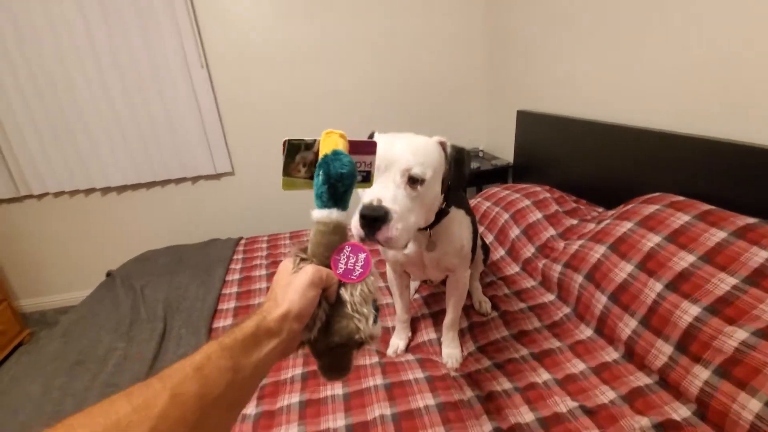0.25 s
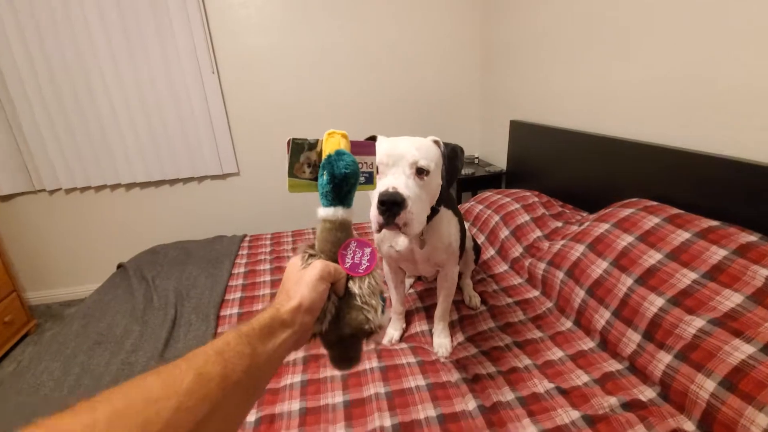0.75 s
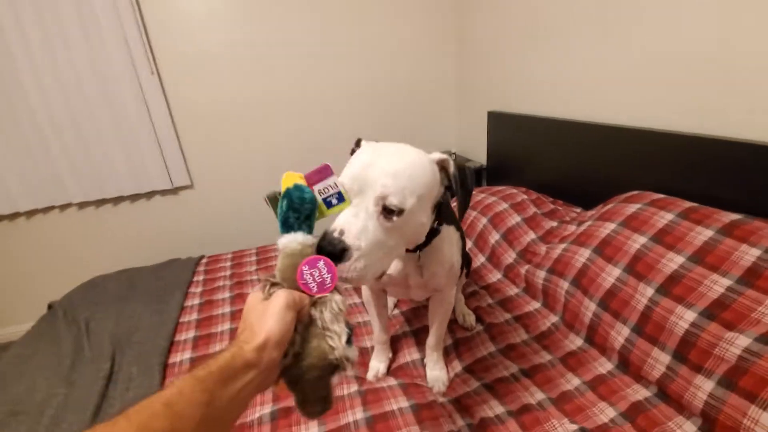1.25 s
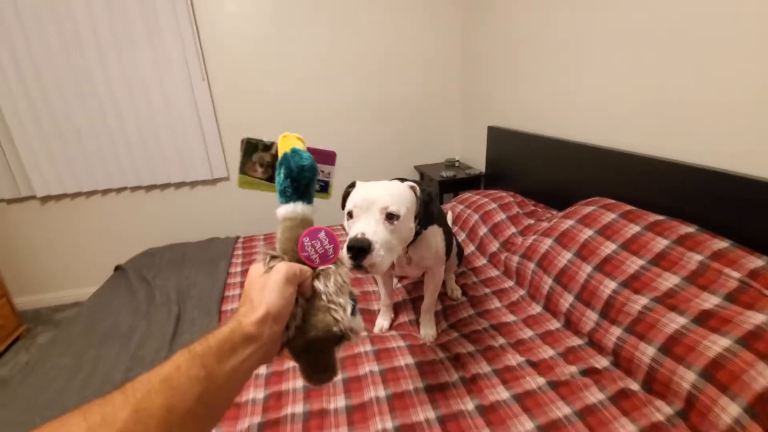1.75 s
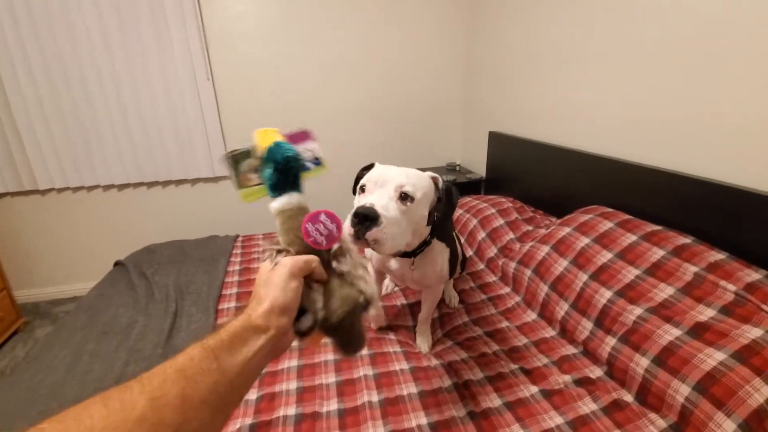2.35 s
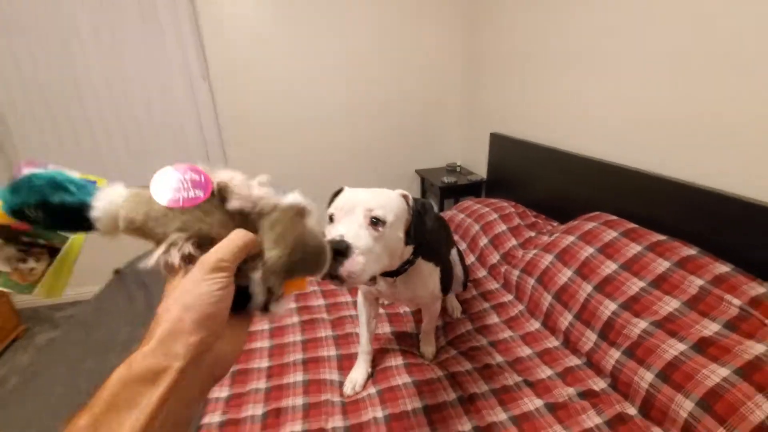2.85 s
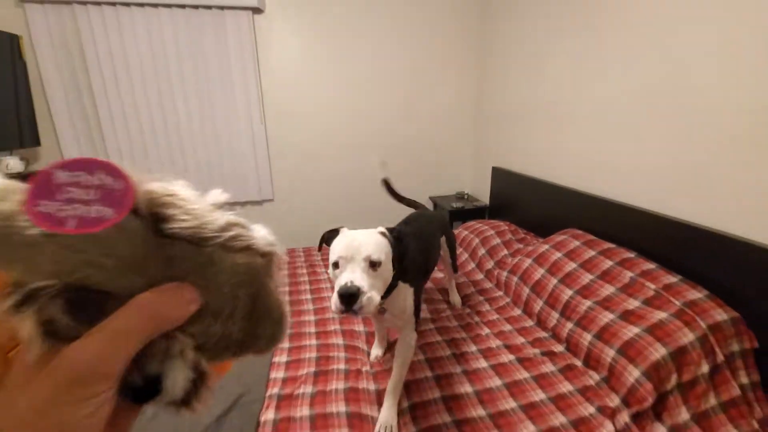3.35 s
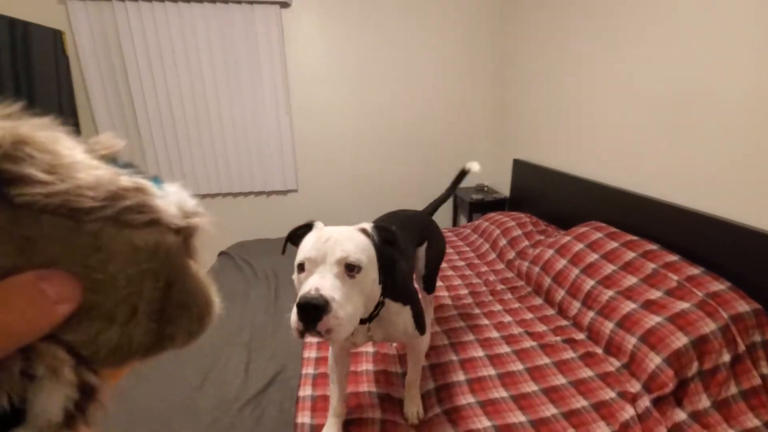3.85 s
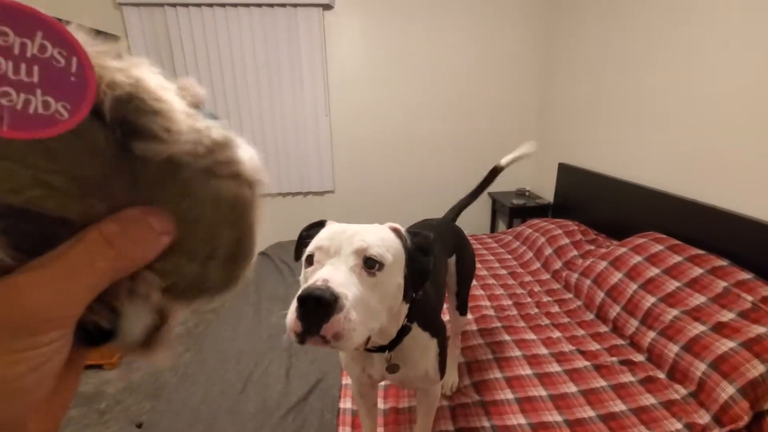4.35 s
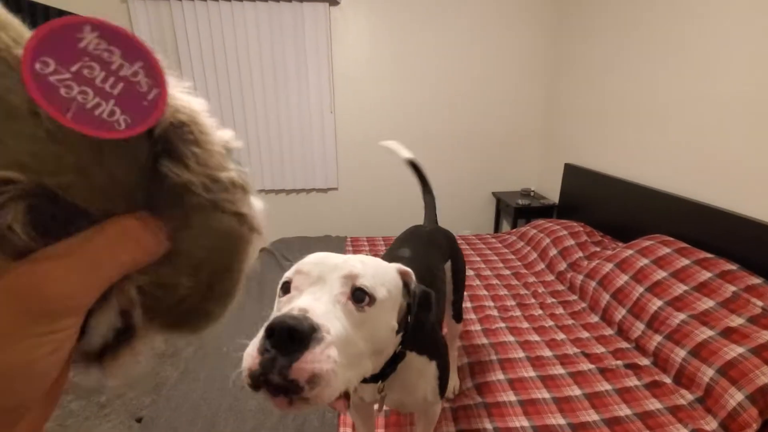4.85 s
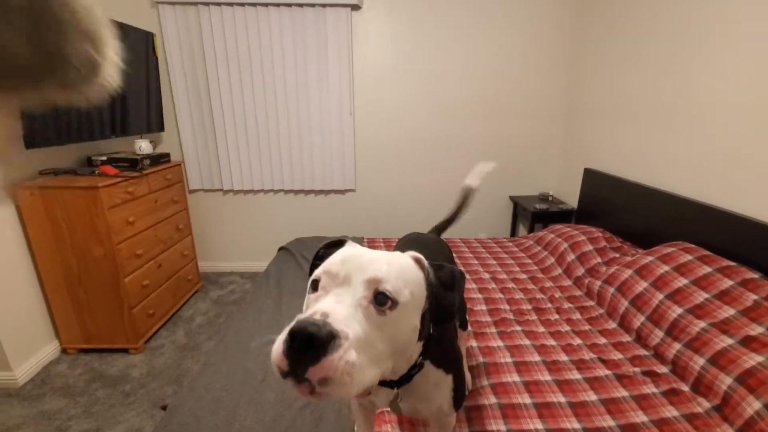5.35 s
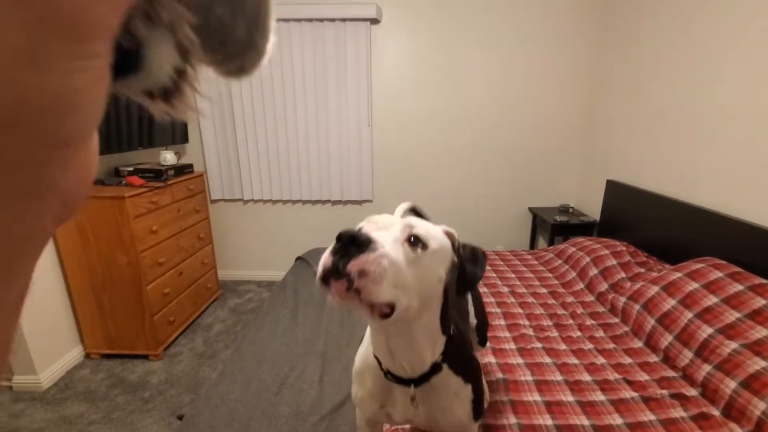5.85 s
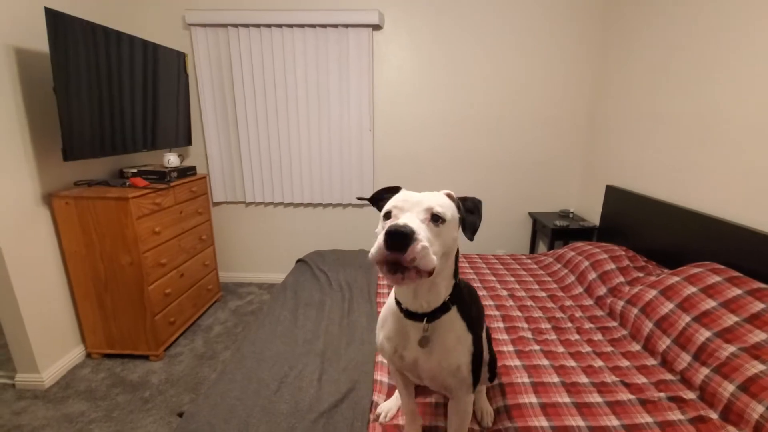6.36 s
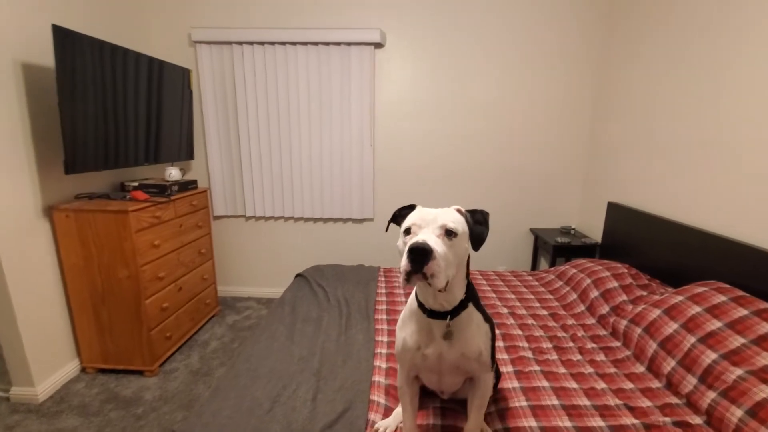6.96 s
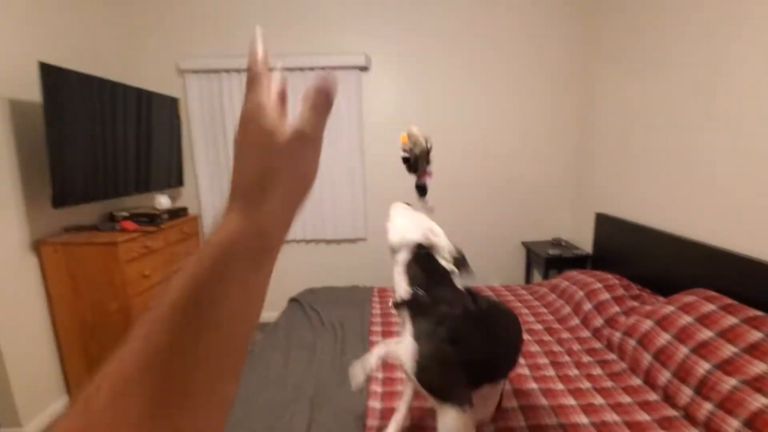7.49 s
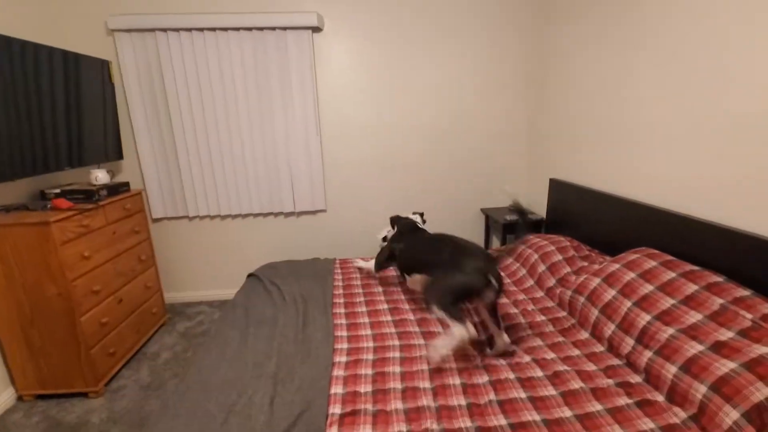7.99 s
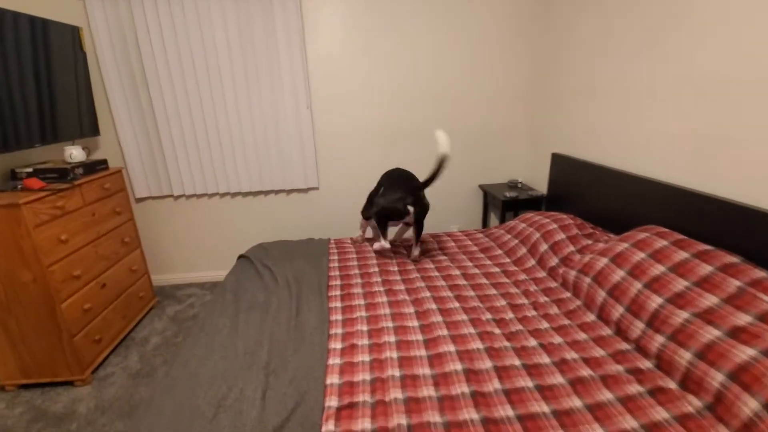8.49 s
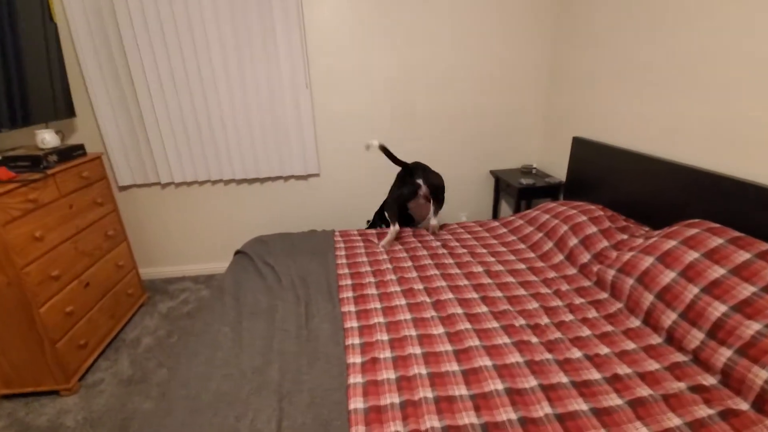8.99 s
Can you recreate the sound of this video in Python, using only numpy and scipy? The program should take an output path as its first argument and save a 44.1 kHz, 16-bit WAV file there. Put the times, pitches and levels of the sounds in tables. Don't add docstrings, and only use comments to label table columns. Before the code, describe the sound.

Close stereo handheld microphone in a softly reverberant carpeted bedroom. Fur and card tags rustle, scrape and snap over low handling rumble and a strong dull thud. A squeaky plush toy then gives two short chirps, a quick run of five, one higher squeak and a last, highest one. Finally a dog bumps the bed, and its collar jingles lightly amid bedding rustle.

```python
import sys
import numpy as np
from scipy import signal
from scipy.fft import rfft, irfft, next_fast_len
from scipy.io import wavfile
from scipy.ndimage import uniform_filter1d, minimum_filter1d, map_coordinates

SR = 44100
rng = np.random.default_rng(int(sys.argv[2]) if len(sys.argv) > 2 else 0)


def attenuation_scalar(level_db):
    decades = np.asarray(level_db, float) / 20
    return 10 ** decades


def master_out(mix):
    frames = np.transpose(np.atleast_2d(mix))
    ceiling = np.clip(frames, -1, 1)
    pcm = np.round(ceiling * 32767).astype(np.int16)
    wavfile.write(sys.argv[1], SR, pcm)


N = 407043

# time_s, level_db
UNREST = [(0, 5.5), (.7, -4), (1.1, 14.5), (2.1, 6.5), (2.27, 4), (2.6, 7), (3.2, 5.5), (3.45, -3),
          (3.92, -12), (4.4, 1.5), (5.2, -4), (5.48, -16), (6.2, -18.5), (6.95, -23), (7.45, 3),
          (7.97, -0.5), (8.6, -2.5), (9.23, 5.5)]


def at_hz(points, hz):
    points_hz, points_db = np.transpose(points)
    return np.interp(np.log(hz), np.log(points_hz), points_db)


def in_time(rows):
    s, *columns = np.transpose(rows)
    return [np.interp(np.arange(N) / SR, s, column) for column in columns]


def rms_one(x):
    return x / np.sqrt(np.mean(x ** 2) + 1e-20)


def bandpass(x, low_hz, high_hz, order=2):
    return signal.sosfilt(signal.butter(order, [low_hz, high_hz], "band", fs=SR, output="sos"), x)


def highpass(x, hz, order=2):
    return signal.sosfilt(signal.butter(order, hz, "high", fs=SR, output="sos"), x)


def coloured(points, channels=1):
    size = next_fast_len(N)
    hz = np.maximum(np.arange(size // 2 + 1) * SR / size, 1)
    gain = (hz > points[0][0] / 2) * attenuation_scalar(at_hz(points, hz))
    white = rng.standard_normal((channels, size))
    return rms_one(irfft(rfft(white) * gain, size)[:, :N])


def drift(rate_hz):
    knots = rng.standard_normal(int(N / SR * 200) + 2)
    return np.interp(np.arange(N) / SR * np.clip(rate_hz, 1, 190), np.arange(len(knots)), knots)


def swells(s, hold_s, level_db, rise_db_s, fall_db_s):
    t = np.arange(0, N + 64, 64) / SR
    early = np.maximum(s[:, None] - t, 0)
    late = np.maximum(t - (s + np.abs(hold_s))[:, None], 0)
    moves = attenuation_scalar(level_db[:, None] - rise_db_s * early - fall_db_s * late)
    return np.interp(np.arange(N) / SR, t, np.sqrt(np.sum(moves ** 2, axis=0)))


def ports(x, lag, pan_db=0):
    late = np.interp(np.arange(N) - lag, np.arange(N), x)
    return np.array([x * attenuation_scalar(pan_db / 2), late * attenuation_scalar(-pan_db / 2)])


def squeaker():
    # start_s, top_hz, rise_s, held_s (until let go), level_db
    squeezes = [
        (2.7518, 1525, .044, .0435, -7),
        (2.977, 1797, .033, 0.041, -5),
        (3.988, 1750, 0.031, 0.049, -5.5),
        (4.199, 1658, .030, 0.043, -5.5),
        (4.397, 1787, 0.02, 0.046, -6),
        (4.591, 1675, .034, 0.046, -7.5),
        (4.787, 1578, .032, .048, -6.5),
        (5.6005, 2028, 0.049, .047, -6),
        (7.140, 2403, .043, 0.046, -5.5),
    ]
    climbs = [1.1, 1.05, .86, 1.1, 1.1, 0.69, 1.2, 1.02, 1.03]
    vents_db = [0.5, -1, -2, -2, -2, 1, -2, -3, 0.5]
    reed_db = [5, -8, -13, -15, -20, -23, -25, -27, -28, -29, -31, -32]
    # freq_hz, level_db
    plush = [(900, -14.5), (1250, -15.5), (1500, -8.5), (1750, -4), (2000, -4), (2400, -3.5), (2800, -3),
             (3500, 0.5), (5200, -1.5), (7200, 3), (8600, -4.5), (10000, -10), (12000, -9.5), (16000, -4)]
    sag_hz, sag_s, fade_s = 1100, 0.0063, 0.019
    flip_hz, flip_ratio, flipped_db = 2340, 1.14, -8
    purer_db, let_go_db, slack_db = -0.5, 1.66, 3.5
    choke_hz, choke_db = 1750, -8.5
    waver_db, own_waver = 2.6, .8
    air_db, refill_db, refill_t60_s = -22, -38, 0.62
    tone_len = 5000

    out, t = np.zeros((2, N)), np.arange(int(.5 * SR)) / SR
    air = bandpass(rng.standard_normal((2, N)), 2500, 9500, order=4)
    order = np.arange(1, len(reed_db) + 1)[:, None]
    waver = rng.standard_normal((len(squeezes), 3, len(reed_db), 30))
    waver = np.sqrt(1 - own_waver ** 2) * waver[:, :1] + own_waver * waver[:, 1:]
    for (s, top_hz, rise_s, held_s, level_db), climb, vent_db, knots in zip(squeezes, climbs, vents_db, waver):
        at = round(s * SR)
        gone = np.maximum(t - held_s, 0) * min(top_hz / 1700, 1) ** 3.5

        first_hz = 1240 + 0.1 * (top_hz - 1750)
        pressed = first_hz + (top_hz - first_hz) * np.sin(np.pi / 2 * np.minimum(t / rise_s, 1.2) ** climb)
        pressed = uniform_filter1d(pressed * np.where(pressed > flip_hz, flip_ratio, 1), size=90)
        hz = (sag_hz + (pressed - sag_hz) * np.exp(-(gone / sag_s) ** 1.05))[:tone_len]
        turns = 2 * np.pi * np.cumsum(hz) / SR
        blow = np.clip(t / 0.0021, 0, 1) * np.exp(-(gone / fade_s) ** 2)

        unsteady = np.array([[np.interp(t[:tone_len], np.arange(30) * .005, k) for k in port] for port in knots])
        unsteady = unsteady * np.sqrt(np.minimum(order, 5) - .8)
        flipped = np.clip((pressed[:tone_len] / flip_hz - 1) / (flip_ratio - 1), 0, 1)
        height_db = np.array(reed_db)[:, None] + (vent_db + flipped_db * flipped) * (order > 1)
        height_db = height_db + purer_db * np.log2(hz / 1500) * np.log2(order) + waver_db * unsteady
        height_db = height_db - gone[:tone_len] / sag_s * (let_go_db * np.log2(order) + slack_db * (order == 1))
        height_db = height_db + choke_db * np.log2(np.maximum(hz / choke_hz, 1)) + at_hz(plush, order * hz)
        heights = attenuation_scalar(height_db) * (order * hz < 17000)
        tone = np.sum(heights * np.cos(order * turns + .12 * order ** 2), axis=1)
        out[:, at:at + tone_len] -= attenuation_scalar(level_db) * blow[:tone_len] * tone

        refill = attenuation_scalar(refill_db - 60 * gone / refill_t60_s) * (1 - blow) * (t > held_s)
        hiss = attenuation_scalar(air_db) * blow + refill
        out[:, at:at + len(t)] += attenuation_scalar(level_db) * hiss * air[:, at:at + len(t)]
    return out


def held_close(x):
    # time_s, right_lag_samples, left_right_db
    hand = [
        (2.8, 18, -1.5),
        (3.0, 20.5, -2.5),
        (4.0, 22, .5),
        (4.7, 22, 1),
        (4.82, 21.5, 1.5),
        (5.6, 23, 4),
        (7.1, 19.5, 2.5),
    ]
    # left_delay_s, right_delay_s, level_db
    echoes = [(.00035, .00025, -12), (.0034, .0027, -14), (.0071, .0083, -15), (.0112, .0098, -16)]
    # freq_hz, left_right_db
    lean = [(60, 2.5), (110, 6), (200, 0.5), (380, -2.5), (700, -0.5), (1290, 2), (2380, -9), (4400, 6.5),
            (8120, 1), (15000, 9.5)]
    # freq_hz, phase_rad
    bend = [(1300, 1.95), (1750, 2.15), (2600, 1.35), (3400, .6)]
    size = next_fast_len(N)
    hz = np.maximum(np.arange(size // 2 + 1) * SR / size, 1)
    paths = 1 + sum(attenuation_scalar(db) * np.exp(-2j * np.pi * hz * [[left], [right]]) for left, right, db in echoes)
    shadow = attenuation_scalar(at_hz(lean[1:], hz) * [[.5], [-.5]])
    shadow = shadow * np.exp(1j * at_hz(bend, hz) * np.array([[0], [1]]))
    lag, pan_db = in_time(hand)
    late = map_coordinates(x[1], [np.arange(N) - lag], order=3)
    direct = [x[0], late] * attenuation_scalar(pan_db * [[.5], [-.5]])
    return irfft(rfft(direct, size) * paths * shadow, size)[:, :N]


def ticks():
    # start_s, peak_db, centre_hz, left_right_db
    tick_rows = [(0.0135, -42, 3800, 0), (0.0738, -30, 5800, 35), (0.0748, -14, 2330, -7),
                 (1.104, -34, 3600, 7), (2.502, -28, 3024, 2.5), (2.533, -37.5, 2955, -4.5),
                 (2.56, -32.5, 2520, 2), (2.599, -32, 3040, 5.5), (2.626, -29, 5110, -2.5),
                 (2.694, -34, 4430, 2), (2.7385, -30.5, 3100, -1), (8.091, -28, 3850, -1),
                 (8.103, -28, 2600, 0), (1.1355, -20.5, 3700, 4), (1.3585, -42, 2900, -11),
                 (2.387, -26.5, 3250, -2.5), (2.5043, -12, 3420, 9), (1.108, -26, 3500, 6),
                 (2.7152, -22, 6000, 8), (3.254, -17.5, 5250, 7), (3.3243, -23.5, 3230, 1),
                 (3.467, -33.5, 4650, 5), (4.9652, -35, 3640, -5), (5.1508, -23, 4000, 8.5),
                 (5.3293, -49, 3283, 2.5), (5.7664, -19.5, 5860, 12), (5.9505, -34.5, 3770, 9.5),
                 (6.0487, -36.5, 6730, 8.5), (6.6589, -44, 3360, -12), (6.7351, -47.5, 3874, -1),
                 (7.462, -40, 2800, -1)]
    # start_s, peak_db
    crackle_rows = [(0.0263, -32.5), (0.0816, -24.5), (0.9887, -31), (2.347, -37), (2.407, -16),
                    (2.5462, -21.5), (2.6643, -34.5), (2.738, -37.5), (2.9118, -25), (3.1287, -30.5),
                    (3.1358, -24.5), (3.1943, -32.5), (4.138, -31.5), (4.3233, -33), (4.3837, -27.5),
                    (4.7204, -28.5), (4.9194, -34.5), (5.5763, -38.5), (5.7796, -21.5), (5.958, -40),
                    (6.1045, -38)]
    # start_s, peak_db
    snap_rows = [(1.0147, -26), (1.0514, -34), (1.1114, -35), (2.4444, -41.5), (2.4694, -43.5),
                 (2.584, -43), (5.0893, -42), (5.15, -25), (6.1454, -61), (6.1892, -56), (6.352, -46),
                 (6.3854, -59.5), (6.442, -55.5), (9.0009, -44)]
    out, t = np.zeros((2, N)), np.arange(300) / SR
    rows = [*tick_rows]
    rows += [(s, peak_db, 10500, 4.5) for s, peak_db in crackle_rows]
    rows += [(s, peak_db, 13000, 3.5) for s, peak_db in snap_rows]
    for (s, peak_db, hz, pan_db), crack in zip(rows, rng.standard_normal((len(rows), len(t)))):
        at = round(s * SR)
        snap = (.4 * np.sin(2 * np.pi * hz * t) + .6 * crack) * attenuation_scalar(-60 * t / .004)
        out[:, at:at + len(t)] += attenuation_scalar(peak_db + 2.5 + pan_db * np.array([[.5], [-.5]])) * snap
    out[1] = np.roll(out[1], 18)
    return highpass(out, 1500)


def scrapes():
    # start_s, hold_s, level_db, centre_hz
    scrape_rows = [(0.154, 0.0028, -58, 1630), (0.287, 0.012, -55.5, 2580), (0.467, 0.026, -69, 2800),
                   (0.572, 0.048, -62.5, 7040), (0.865, 0.044, -58, 3000), (1.032, .01, -51, 2500),
                   (1.233, 0.013, -50, 2360), (1.28, 0.0083, -43.5, 3200), (1.286, .004, -50, 1720),
                   (1.36, 0.047, -48, 2960), (1.365, 0.055, -53, 2120), (1.518, 0.049, -50, 2905),
                   (1.676, 0.022, -52, 1240), (1.742, 0.038, -50, 2670), (2.399, 0.026, -47.5, 3060),
                   (2.411, 0.0058, -47.5, 1730), (2.494, 0.013, -43, 2950), (6.232, 0.039, -64, 4120),
                   (8.081, 0.004, -53, 1900), (5.08, 0.0064, -57, 2240), (7.459, 0.004, -48.5, 2550),
                   (7.637, 0.006, -50, 1100), (8.097, 0.014, -41.5, 2380), (8.1, 0.0062, -45.5, 920),
                   (8.103, 0.0054, -42, 3000)]
    rise_db_s, fall_db_s, width_ratio, lead_s = 3000, 290, 1.13, .02
    out, t = np.zeros((2, N)), np.arange(8000) / SR - lead_s
    for (s, hold_s, level_db, hz), noise in zip(scrape_rows, rng.standard_normal((len(scrape_rows), 2, len(t)))):
        hiss = bandpass(noise + 0.8 * noise[::-1], hz / width_ratio, hz * width_ratio)
        fall_db = fall_db_s * np.maximum(t - abs(hold_s), 0)
        gain = attenuation_scalar(level_db - rise_db_s * np.maximum(-t, 0) - fall_db)
        at = round((s - lead_s) * SR)
        out[:, at:at + len(t)] += gain * rms_one(hiss)
    return out


def fibres(bright):
    # start_s, hold_s, level_db, brightness_db
    strokes = [(0, 0.082, -63, -14), (.1, 0.092, -63, -9), (.285, 0.091, -67, -25),
               (.47, 0.011, -58.5, -22), (.565, 0.041, -59.5, -10), (.86, 0.28, -63, -5),
               (.975, 0.093, -52, -5), (1.27, 0.058, -64, -22), (1.51, 0.025, -56.5, -3.5),
               (1.64, 0.14, -50, -20), (1.835, 0.039, -51, -7.5), (1.99, 0.06, -54.5, -4.5),
               (2.385, 0.21, -56, 0), (3.28, 0.051, -58.5, -5), (3.74, 0.04, -60, -14.5),
               (5.13, 0.14, -65.5, -10.5), (6.19, 0.032, -60.5, -10.5), (6.23, 0.067, -62, -10.5),
               (6.34, 0.12, -67, -10.5), (7.68, 0.099, -66, -8), (7.765, 0.055, -58.5, -5.5),
               (8.2, 0.14, -63, -10), (8.68, 0.1, -57.5, -20), (9.0, 0.07, -61, -13),
               (9.09, 0.034, -55.5, -13), (9.21, 0.02, -63, -9)]
    # start_s, hold_s, level_db, brightness_db
    flicks = [(.083, 0, -52.5, -0.5), (1.137, 0, -100, -29), (1.357, 0, -38, -16), (2.5, 0.034, -61, 7.5),
              (3.468, 0, -59.5, -17), (5.328, 0.0037, -57, -12.5), (6.05, 0.0021, -70.5, -9),
              (6.66, 0.0029, -70.5, -12), (7.463, 0, -60, -28), (7.634, 0.00069, -55, -9.5),
              (8.092, 0.02, -41.5, -3.5), (8.472, 0, -71.5, 5.5)]
    rest_db, rest_bright_db, follows = -66.5, -11.5, 1.29
    power = attenuation_scalar(rest_db + follows * in_time(UNREST)[0] + bright * rest_bright_db) ** 2
    for rows, rise_db_s, fall_db_s in ((strokes, 620, 210), (flicks, 5000, 195)):
        s, hold_s, level_db, bright_db = np.transpose(rows)
        power = power + swells(s, hold_s, level_db + bright * bright_db, rise_db_s, fall_db_s) ** 2
    return np.sqrt(power)


def rustle():
    # freq_hz, level_db
    fur_spectrum = [(350, -33), (600, 0), (1180, 2.5), (2800, 2.5), (3600, -1.5), (4900, -12.5),
                    (7000, -15.5), (8300, -20), (14700, -28.5), (16000, -30)]
    fur = coloured(fur_spectrum, channels=2) * attenuation_scalar(2.0 * drift(150))
    together = drift(22)
    edges_hz = [250, 700, 1200, 1900, 2500, 3200, 4000, 5000]
    low = 0
    for k, (low_hz, high_hz) in enumerate(zip(edges_hz, edges_hz[1:])):
        band = bandpass(np.roll(fur, 5003 * (k + 1), axis=1), low_hz, high_hz)
        low = low + band * attenuation_scalar(1.2 * together + 2.2 * drift(18))
    high = rms_one(highpass(fur, 5000, order=3)) * attenuation_scalar(6.5 + 0.64 * drift(32))
    return attenuation_scalar(4.5) * (fibres(0) * rms_one(low) + fibres(1) * high)


def ring(clicks, hz, t60_s):
    r, w = attenuation_scalar(-60 / (t60_s * SR)), 2 * np.pi * hz / SR
    return signal.lfilter([0, np.sin(w)], [1, -2 * r * np.cos(w), r * r], clicks + 1e-18)


def collar():
    # start_s, hold_s, name_tag_db, ring_db, buckle_db
    shakes = [
        (7.66, .01, -55, -45.5, -80),
        (7.69, 0.023, -45.5, -60, -72),
        (7.762, 0.034, -48, -58, -56),
        (7.798, 0.067, -35.5, -74, -69),
        (8.182, 0.09, -68, -81, -79),
        (8.334, 0.046, -67.5, -78.5, -78.5),
        (8.665, 0.016, -73, -70, -48.5),
        (8.74, .01, -51.5, -76, -75),
    ]
    # freq_hz, level_db, t60_s
    tag_modes = [(7060, -14, .1), (7135, -13, .1), (11330, -4, .1), (11410, 0, .12), (11500, -1, .12)]
    # freq_hz, level_db, t60_s
    ring_modes = [(9720, -2, .07), (10050, -3, .06), (10160, 0, .07)]
    # freq_hz, level_db, t60_s
    buckle_modes = [(10870, 0, .15)]
    out = 0
    s, hold_s, *parts_db = np.transpose(shakes)
    gains = [swells(s, hold_s, db, 840, 350) for db in parts_db]
    for modes, gain in zip((tag_modes, ring_modes, buckle_modes), gains):
        knocks = (rng.random(N) < 250 / SR) * attenuation_scalar(3.5 * rng.standard_normal(N))
        knocks = knocks * (gains[0] > attenuation_scalar(-94))
        metal = sum(attenuation_scalar(db) * ring(ring(knocks, hz, 0.00069), hz, t60_s) for hz, db, t60_s in modes)
        out = out + attenuation_scalar(-1.5) * gain * rms_one(metal) * 0.33
    return out


def bumps():
    # start_s, peak_db, pitch_hz, t60_s
    blows = [
        (0.827, -51, 51.7, 0.051),
        (1.068, -17, 86.4, 0.29),
        (1.619, -26, 56.5, 0.056),
        (2.549, -40, 60, 0.059),
        (3.088, -44, 54, 0.15),
        (7.637, -19, 191, 0.049),
        (7.631, -34, 1090, 0.017),
    ]
    # start_s, peak_db, pitch_hz, t60_s
    taps = [
        (1.354, -20.5, 313, 0.016),
        (1.92, -34.5, 604, 0.051),
        (4.155, -38, 189, 0.043),
        (4.347, -22.5, 437, 0.012),
        (4.935, -29, 423, 0.036),
        (5.081, -39, 420, 0.058),
        (6.275, -47, 216, 0.12),
        (7.284, -29, 480, 0.025),
        (8.046, -33.5, 424, 0.092),
        (9.095, -40.5, 588, 0.11),
    ]
    out, t = np.zeros(N), np.arange(int(.12 * SR)) / SR
    edges = np.clip(t / 0.0036, 0, 1) * np.clip(20 * (1 - t / t[-1]) / 6, 0, 1)
    for s, peak_db, hz, t60_s in (*blows, *taps):
        at = round(s * SR)
        out[at:at + len(t)] += attenuation_scalar(peak_db - 60 * t / t60_s) * np.sin(2 * np.pi * hz * t) * edges
    return out


def grip():
    # start_s, hold_s, rumble_db, left_right_db
    shift_rows = [(0, 0.014, -65, -15), (0.196, 0, -47, 41), (0.227, 0.12, -36.5, 21), (.46, 0, -47.5, 23),
                  (0.82, 0.079, -48.5, 44), (0.963, 0, -23.5, 15), (1.074, 0, -29.5, 10),
                  (1.156, 0.12, -32, 7), (1.244, 0.23, -44.5, 18.5), (1.62, 0, -31.5, 21.5),
                  (1.657, 0.081, -38.5, 21), (1.83, 0.13, -41, 9), (2.039, 0.044, -35.5, 7),
                  (2.363, 0.22, -35.5, 13), (2.539, 0, -28.5, 17), (2.609, 0.05, -52.5, 29),
                  (3.095, 0.00045, -29.5, 23), (3.153, 0.05, -43, 7), (3.473, 0.025, -46, 3.5),
                  (5.09, 0.023, -44, 5.5), (7.443, 0.06, -44.5, 8.5), (7.656, 0.00023, -32, -2),
                  (7.784, 0.057, -37, -3), (8.03, 0.36, -42.5, -1), (8.71, 0.055, -45, -7),
                  (8.783, 0.21, -44, 27), (8.93, 0.12, -34.5, 4), (9.097, 0.22, -44.5, -4)]
    # start_s, hold_s, level_db
    thud_rows = [(0, 0.022, -53), (0.242, 0.057, -47), (0.86, 0.22, -51.5), (1.081, 0.11, -38),
                 (1.35, 0.062, -43.5), (1.67, 0.051, -53), (2.11, 0.013, -50), (2.433, 0.21, -51),
                 (3.102, 0.1, -84), (3.476, 0.19, -74), (4.37, 0, -57), (4.933, 0.11, -53),
                 (6.24, 0.15, -57.5), (7.444, 0.078, -62), (7.634, 0.15, -49.5), (7.79, 0, -41.5),
                 (8.026, 0.22, -51.5), (8.29, 0.077, -45), (8.783, 0, -52), (9.074, 0.11, -48),
                 (9.22, 0, -43)]
    # freq_hz, density_db_per_hz
    rumble_spectrum = [(12, -44), (20, -13.5), (42, 4.5), (75, 7), (119, -5), (157, -10.5), (200, -18),
                       (260, -37.5), (440, -120)]
    # freq_hz, density_db_per_hz
    thud_spectrum = [(76, -21.5), (130, -3.5), (248, -2.5), (285, -3.5), (372, -5.5), (900, -17),
                     (1170, -19.5), (1980, -120)]
    unrest_db, = in_time(UNREST)
    s, hold_s, level_db, pan_db = np.transpose(shift_rows)
    shifts = np.array([swells(s, hold_s, level_db + side * pan_db / 2, 250, 390) for side in (1, -1)])
    own = coloured(rumble_spectrum, channels=2)
    rumble = rms_one(own + .1 * own[::-1]) * attenuation_scalar(-4 + 2.5 * drift(14))
    rumble = rumble * np.hypot(shifts, attenuation_scalar(-59.5 + unrest_db))
    thuds = np.hypot(swells(*np.transpose(thud_rows), 1100, 440), attenuation_scalar(-57.5 + 0.5 * unrest_db))
    shared, apart = coloured(thud_spectrum, channels=2)
    return rumble + thuds * attenuation_scalar(3.6 * drift(25)) * (shared + 0.21 * apart * [[1], [-1]])


def bedroom(x):
    # freq_hz, t60_s
    room_t60 = [(500, 0.4), (1500, 0.61), (3000, 0.45), (6000, 0.53), (12000, 1)]
    level_db, pan_db, early_gain, early_s = -13, -4.5, 1.3, .035
    t, tail = np.arange(int(.7 * SR)) / SR, 0
    for low_hz in 200 * 2. ** np.arange(6):
        band = bandpass(rng.standard_normal((2, len(t))), low_hz, 2.3 * low_hz)
        decay = attenuation_scalar(-60 * t / at_hz(room_t60, low_hz * np.sqrt(2)))
        tail = tail + band / np.sqrt(np.mean(band ** 2) / low_hz) * decay
    tail = tail * (1 + early_gain * np.exp(-t / early_s)) * np.clip((t - .005) / .008, 0, 1)
    tail = tail / np.sqrt(np.sum(tail ** 2) / 2)
    wet = signal.fftconvolve(x[None], tail, axes=1)[:, :N]
    return attenuation_scalar(level_db + pan_db * np.array([[.5], [-.5]])) * wet


def room_floor():
    # freq_hz, density_db_per_hz
    floor_spectrum = [(15, -39), (25, -11.5), (53, 6), (74, -14.5), (108, 5.5), (145, -45.5), (229, -1),
                      (270, -15), (439, -7), (575, -16), (16000, -40.5)]
    hum = coloured(floor_spectrum, channels=2)
    bass = signal.sosfilt(signal.butter(1, 600, fs=SR, output="sos"), hum[::-1] - hum)
    return attenuation_scalar(-61.5 + 1.0) * (hum + .45 * bass)


def scene():
    toy, snaps, metal = squeaker(), ticks(), collar()
    near = held_close(toy) + snaps + ports(metal, -0.98, pan_db=-5.0) + ports(bumps(), 15.0)
    near = near + bedroom(toy[0] + .6 * snaps[0] + metal)
    return near + scrapes() + rustle() + grip() + room_floor()


def top_cut(x):
    return signal.sosfilt(signal.butter(12, 16660, fs=SR, output="sos"), x)


def record(dry):
    cutoff_hz, limit_s = 16300, .004
    cut = signal.sosfilt(signal.cheby2(10, 60, cutoff_hz + 500, fs=SR, output="sos"), dry)
    span = round(limit_s * SR)
    room_left = minimum_filter1d(1 / np.maximum(np.abs(cut).max(axis=0), 1), size=span)
    mix = np.clip(1.061 * cut * uniform_filter1d(room_left, size=span), -1, 1)
    return top_cut(mix)


dry = scene()
out = record(dry)
master_out(out)
```